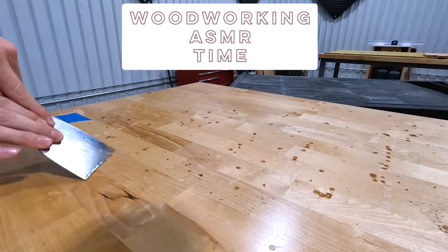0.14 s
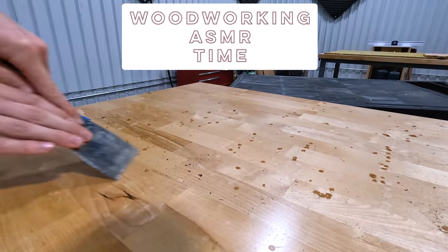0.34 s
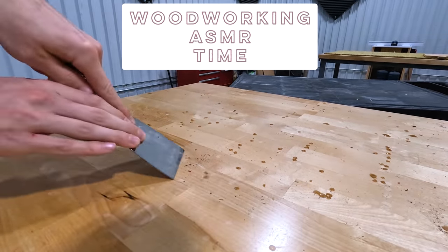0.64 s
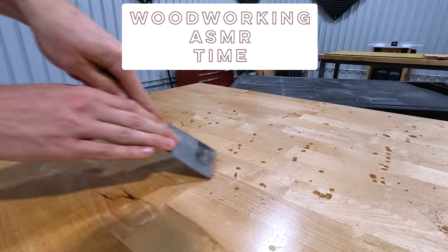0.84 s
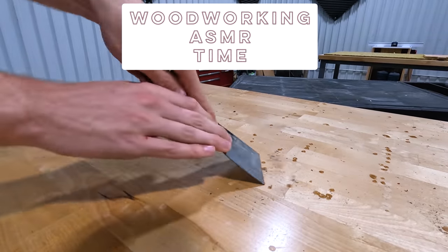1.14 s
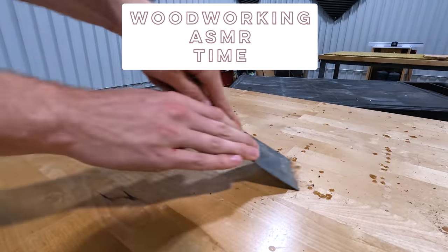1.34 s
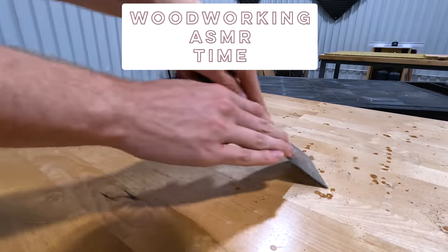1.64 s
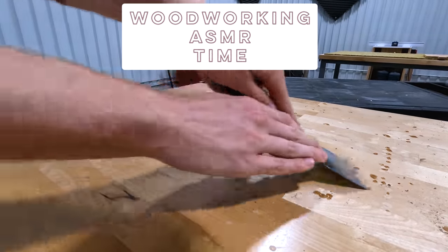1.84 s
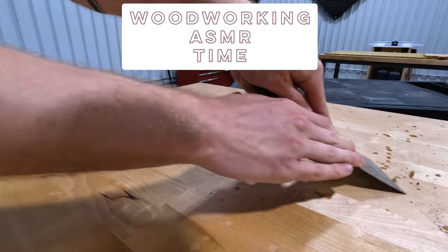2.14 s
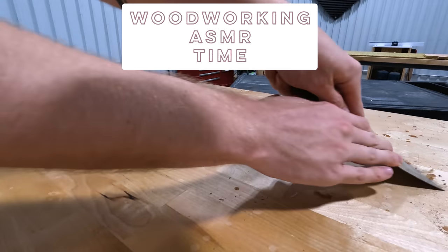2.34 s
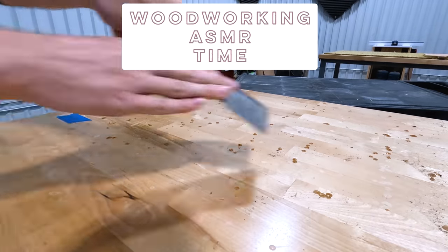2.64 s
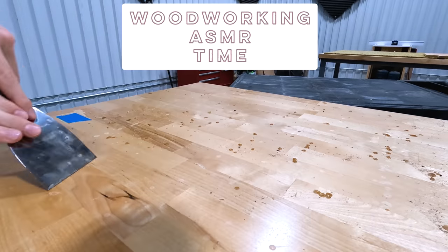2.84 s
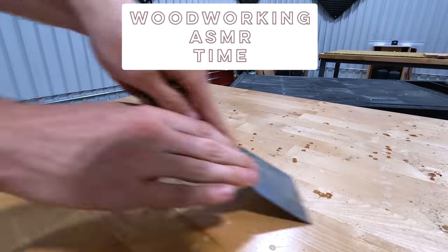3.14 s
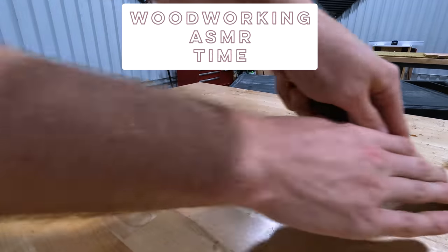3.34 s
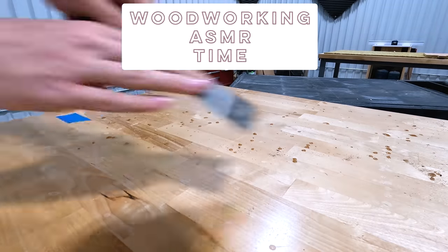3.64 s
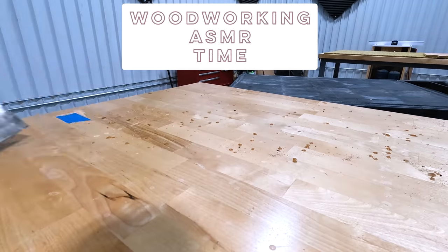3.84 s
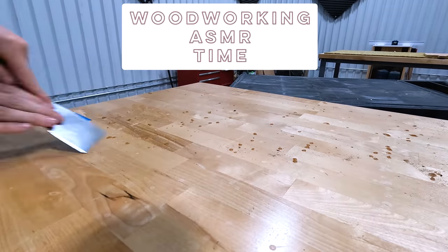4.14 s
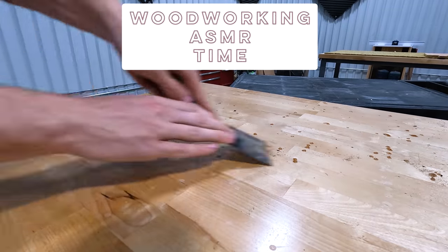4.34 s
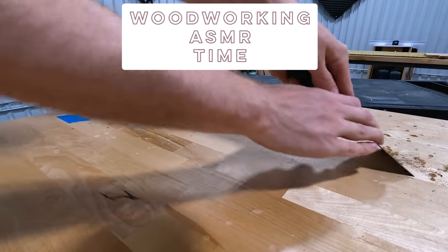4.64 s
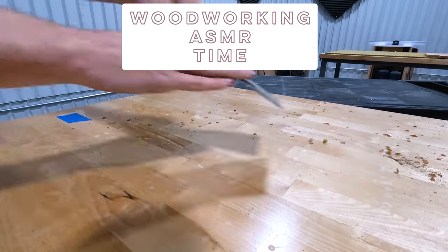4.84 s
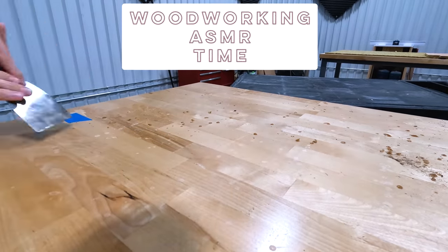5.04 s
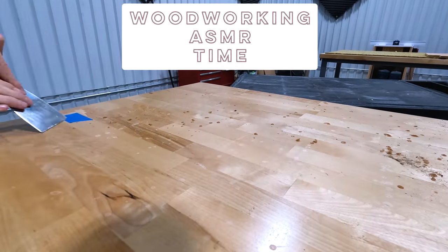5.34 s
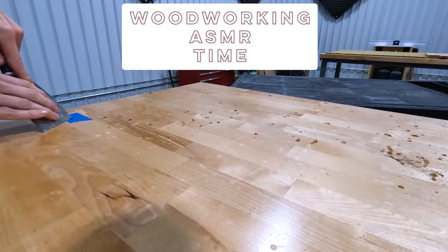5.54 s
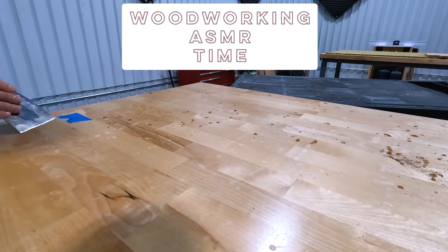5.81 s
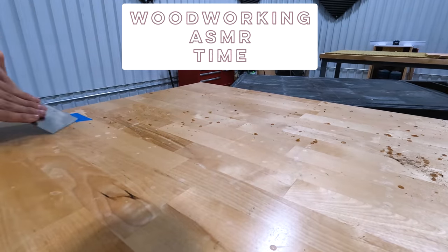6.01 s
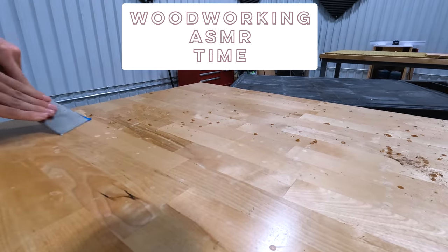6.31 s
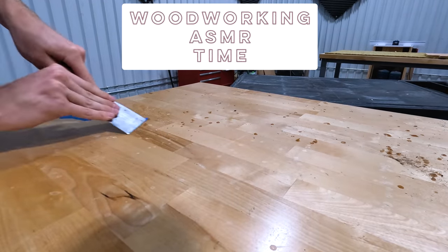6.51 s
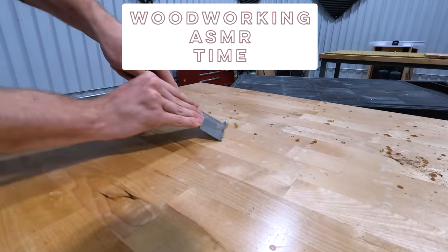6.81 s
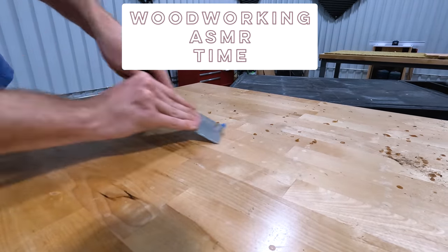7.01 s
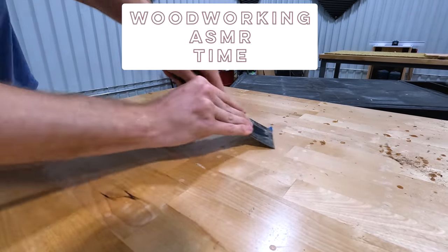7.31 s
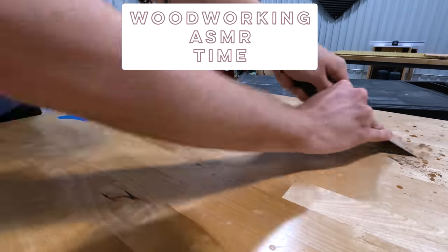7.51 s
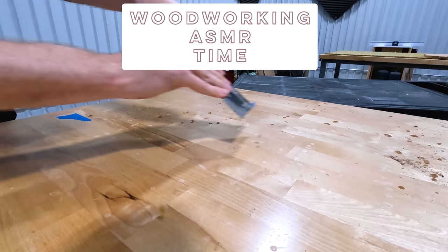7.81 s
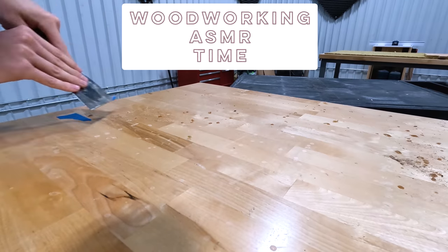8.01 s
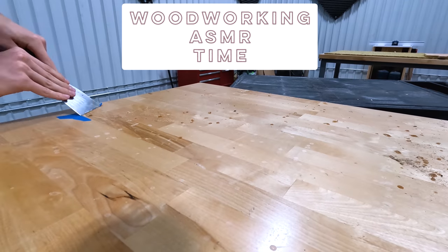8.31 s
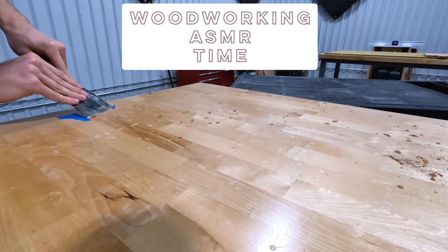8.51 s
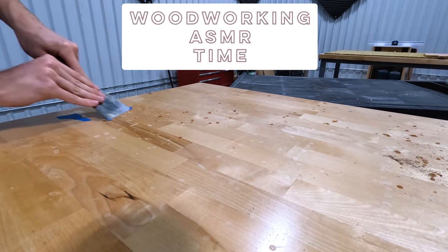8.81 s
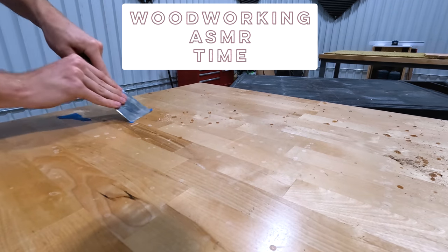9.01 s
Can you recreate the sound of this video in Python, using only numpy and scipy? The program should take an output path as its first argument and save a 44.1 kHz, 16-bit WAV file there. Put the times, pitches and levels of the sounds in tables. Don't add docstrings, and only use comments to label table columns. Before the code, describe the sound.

Close, dry workshop scraping: hissing metal edge strokes on wood, sharp snaps of hardened glue, hollow panel knocks and dull bench thuds.

```python
import sys
import numpy as np
from scipy import signal
from scipy.fft import rfft, irfft, next_fast_len
from scipy.io import wavfile
from scipy.ndimage import uniform_filter1d, map_coordinates

SR = 44100
rng = np.random.default_rng(int(sys.argv[2]) if len(sys.argv) > 2 else 0)


def transcribe(u):
    v = np.clip(np.atleast_2d(u).T, -1, 1)
    q = np.round(v * 32767).astype(np.int16)
    wavfile.write(sys.argv[1], SR, q)


def gain_from_db(level_db):
    decades = np.asarray(level_db, float) / 20
    return 10 ** decades


N = 403956

# time in seconds, sway level in dB, rumble level in dB.
BENCH_SWAY = [(0.0, -27.5, -45), (0.12, -32, -59), (1.28, -44, -47), (1.63, -23.5, -50.5), (2.22, -36, -49),
              (2.7, -31, -68), (4.23, -53, -74), (4.54, -49, -36), (4.69, -37.5, -48), (4.95, -18.5, -55),
              (5.61, -27.5, -53), (5.81, -43, -74), (6.02, -36.5, -64), (6.71, -36, -48), (8.09, -21, -56),
              (8.39, -28.5, -72.5), (9.01, -34.5, -63), (9.16, -32, -45)]
# frequency in Hz, level in dB per Hz.
SHOP_COLOUR = [(35, -35), (60, -10.5), (96, -6), (244, -4), (448, -12.5), (850, -12.5), (1660, -18.5),
               (6000, -30.5), (16000, -43)]
# frequency in Hz, time to fade by 60 dB in seconds.
WALL_FADE = [(200, 0.19), (2000, 0.6), (6000, 0.47), (12000, 0.24)]
# frequency in Hz, side minus middle in dB.
CHANNEL_GAP = [(60, -63), (200, -38.5), (700, -41.5), (1500, -38.5), (4000, -37), (9000, -37.5),
               (15000, -30)]

# frequency in Hz, level in dB, time to fade by 60 dB in seconds.
FRAME_NOTES = [(39.8, -9, 0.74), (91.8, 2.5, 0.48), (142.8, -3, 0.27), (185, -5.5, 0.22), (206, 2, 0.076),
               (238.4, -1.5, 0.12), (275, -6, 0.25), (337.6, 0, 0.074)]
# frequency in Hz, level in dB, time to fade by 60 dB in seconds.
PANEL_NOTES = [(391.6, -1, 0.12), (460.4, -4, 0.23), (534, 3.5, 0.057), (649, -7, 0.067), (700, 1.5, 0.13),
               (752, -4, 0.11), (949, 0, 0.089), (1051, -4.5, 0.073), (1180, -0.5, 0.087),
               (1325, -2, 0.086), (1492, 0.5, 0.046), (1806, 7, 0.034), (1940, -22.5, 0.067),
               (2200, 15, 0.0048)]
# frequency in Hz, level in dB, time to fade by 60 dB in seconds.
FREE_NOTES = [(2640, -14.5, 0.42), (4660, 0, 0.16), (7840, -2, 0.35)]
# frequency in Hz, width in Hz, level in dB held upright,
# level in dB leaning forward.
BLADE_NOTES = [(1610, 210, -14.5, -4.5), (3126, 37, -1.5, -1.5), (4210, 219, -4, -28),
               (5450, 37.6, -14.5, 4), (5820, 159, -5.5, -7), (6430, 170, -1.5, -13.5),
               (6960, 170, -25.5, 7.5), (8480, 100, -9, 13.5), (8700, 280, -6.5, -9.5),
               (9940, 170, -28, 2.5), (12340, 110, -16.5, 3), (12430, 160, -20, 3), (14300, 315, -15.5, 9)]
# frequency in Hz, level in dB per Hz.
HISS_COLOUR = [(290, -37), (500, -11.5), (3250, -6.5), (5710, -5.5), (7000, -7), (8580, -2), (10500, -9.5),
               (16000, -23)]
# frequency in Hz, level in dB per Hz.
CRACK_COLOUR = [(1000, -10), (1800, 3.5), (3200, 5), (5000, -4.5), (9000, -8), (13000, -11.5), (16000, -5)]

# time in seconds, strongest note in Hz under light pressure,
# forward lean from 0 to 1, freedom to sing in dB.
HANDS = [(0, 8670, 0, -4), (.55, 8500, 0, 15), (.75, 8480, 0.89, -5), (2.5, 8800, 0.75, -7),
         (3.05, 8160, 0.1, -12), (3.25, 8700, 0.93, 2), (3.45, 8700, 0.3, -2), (4.05, 8300, 0, -22),
         (4.17, 8450, 0.3, 1), (4.3, 8350, 0.43, 11.5), (4.5, 8640, 0.67, 12.5), (4.7, 8670, 0.76, -23),
         (5.4, 8270, 0, -26.5), (6.0, 8320, 0.32, 0.5), (6.5, 8380, 0.48, 2.5), (7.6, 8500, 0.7, 6.5),
         (8.5, 8400, 0, 1), (9.16, 8320, 0.27, 16)]
# time in seconds, middle note in Hz under light pressure,
# freedom to sing in dB, forward lean from 0 to 1.
FINGERS = [(0, 5450, 6, 0.26), (.6, 5350, 3.5, 0), (.75, 5440, 7, 0.64), (.95, 5480, 2.5, 0.63),
           (1.7, 5457, 4.5, 0.87), (2.5, 5480, 2.5, 0.63), (2.95, 5340, 0.5, 0), (3.2, 5426, 2.5, 1),
           (3.45, 5530, 0, 0.3), (4.05, 5040, 4, 0.25), (4.17, 5170, 9.5, 0.4), (4.3, 5450, 4.5, 0.55),
           (4.62, 5520, 2.5, 0.8), (5.4, 5170, -16, 0.2), (6.1, 5365, 9, 0.1), (7.5, 5430, -2, 0.94),
           (7.62, 5390, -13.5, .6), (8.55, 5300, 2, 0.14)]
# time in seconds, low note in dB, middle note in dB,
# blur of all notes in Hz.
FINGERTIPS = [(0, 0, -5, 44), (.62, -2.5, 2.5, 39.7), (.75, 1, 6.5, 15), (1.3, -4, 4, 15.4),
              (1.5, 0, 7, 15.15), (2.0, -2.5, 5, 18.14), (2.2, -6.5, 0, 22), (2.5, -5.5, 1.5, 26.8),
              (3.2, 1.5, 1.5, 24.5), (4.2, -3, 0.5, 18), (4.65, -1, 3, 18), (6.0, -2, -6.5, 79.4),
              (6.5, -3.5, -1, 84.4), (6.8, 1.5, -3.5, 90.8), (7.1, -4, 4.5, 35), (7.6, -6.5, 3.5, 35),
              (8.5, 0, 1, 40), (9.16, 3, 0, 39.5)]

# fastest moment in seconds, length in seconds, level in dB, brightness in dB.
PUSHES = [(0.163, 0.085, -33.5, -10.5), (0.406, 0.094, -32.5, -7), (0.649, 0.08, -32, 7),
          (0.899, 0.091, -29.5, 11.5), (1.136, 0.07, -27.5, 12.5), (1.379, 0.07, -28.5, 12),
          (1.622, 0.069, -29.5, 12.5), (1.871, 0.069, -28, 12.5), (2.119, 0.084, -26.5, 10.5),
          (2.363, 0.08, -28, 1), (6.06, 0.05, -31, 7), (6.111, 0.12, -29.5, 2.5), (6.446, 0.11, -27.5, 12),
          (6.787, 0.12, -24, 7), (7.126, 0.12, -25, 18), (7.481, 0.16, -29, 12.5), (8.581, 0.088, -35, 7),
          (8.919, 0.13, -27.5, 4)]
# fastest moment in seconds, level in dB.
PULLS = [(0.271, -37.5), (0.516, -37.5), (0.76, -39), (1.011, -42), (1.255, -39.5), (1.497, -36.5),
         (1.751, -41.5), (1.992, -38), (2.234, -37.5), (6.27, -34.5), (6.599, -34.5), (6.952, -35),
         (7.277, -35.5), (8.707, -38.5), (9.075, -36.5)]
# fastest moment in seconds, length in seconds, level in dB.
SCUFFS = [
    (0.034, 0.1, -38),
    (2.556, 0.04, -33.5),
    (3.518, 0.054, -59),
    (4.767, 0.037, -37.5),
    (5.243, 0.03, -53),
    (5.399, 0.079, -26.5),
    (5.832, 0.21, -68),
    (7.66, 0.051, -39.5),
]
# time in seconds, edge pressure as level in dB, brightness in dB.
SWEEPS = [
    [(2.88, -72, -7), (2.93, -43, -6), (3.0, -33, 13.5), (3.1, -28.5, 25), (3.18, -26.5, 12),
     (3.26, -33, 25.5), (3.34, -34.5, 5), (3.41, -37, -3), (3.47, -51, -13.5)],
    [(4.0, -74, -19), (4.07, -37, -9), (4.14, -25.5, 13), (4.23, -26.5, 17.5), (4.28, -28, 7),
     (4.39, -25, 7), (4.5, -40, 11), (4.6, -28.5, 11), (4.66, -55, -8)],
]
# time in seconds, length in seconds, note in Hz,
# half width as a share of the note, level in dB.
FLUTTERS = [(2.252, 0.056, 3220, .008, -49), (3.032, 0.18, 4500, 0.22, -42), (3.201, .3, 4220, 0.3, -50.5),
            (4.117, 0.11, 4510, 0.1, -39.5), (4.308, 0.074, 3260, 0.011, -32),
            (4.423, .1, 3400, 0.029, -41), (4.37, .2, 5620, 0.006, -42.5), (4.558, .17, 5700, .006, -46.5),
            (5.389, 0.074, 4900, .13, -39), (5.79, 0.09, 6600, .025, -66.5), (5.792, 0.13, 4260, .03, -73),
            (5.78, 0.15, 2620, 0.11, -60), (6.055, 0.055, 4200, .045, -48), (6.128, 0.067, 4300, .045, -49),
            (6.411, 0.084, 4280, 0.04, -44), (6.598, .07, 5500, .05, -48.5),
            (7.272, 0.068, 5500, 0.043, -46.5), (7.656, .04, 2300, 0.24, -51),
            (8.588, 0.088, 4250, .045, -51.5), (8.692, 0.069, 4260, .045, -57),
            (8.88, 0.12, 4250, .045, -49), (9.088, 0.13, 5500, 0.093, -50.5)]
# start in seconds, peak of the ring in dB.
LIFTS = [
    (2.568, -50),
    (4.785, -61),
]
# time in seconds, frequency in Hz, level in dB.
BENDING_NOTE = [
    (2.9, 1330, -72),
    (3.0, 1430, -62),
    (3.14, 1550, -64),
    (3.28, 1744, -53),
    (3.37, 1630, -60),
    (3.46, 1325, -54),
    (3.5, 1300, -79),
]
# start in seconds, peak in dB, centre in Hz.
THUDS = [(1.128, -23, 308), (1.176, -26, 178), (1.366, -34.5, 290), (1.626, -17.5, 334), (1.647, -31, 85),
         (2.117, -35, 187), (2.139, -23, 195), (3.243, -29, 291), (4.22, -27.5, 160.6), (4.376, -22, 226),
         (4.435, -32, 213), (4.494, -19.5, 280), (4.598, -29, 214), (4.636, -32.5, 290), (5.41, -23, 208),
         (6.07, -24, 159), (6.444, -23.5, 200), (6.494, -24.5, 230), (6.784, -11.5, 203), (6.811, -18, 277),
         (7.533, -31.5, 341), (8.803, -39, 160)]

# start in seconds, crack peak in dB,
# knock over crack in dB, knock centre in Hz.
QUICK_BEADS = [(0.1464, -10, -16.5, 1240), (0.173, -3.5, -17, 740), (0.4135, -2, -21, 760),
               (0.6697, -15, -9.5, 980), (1.1752, -21.5, 1.5, 515), (1.3664, -7.5, -5, 1070),
               (1.6247, -2, -20, 890), (1.6345, -22, 9, 702), (1.6482, -28.5, 9.5, 693),
               (1.8583, -3.5, -8.5, 890), (2.0981, -9.5, -12.5, 1960), (2.1187, -14, -5.5, 1020),
               (2.1344, -12.5, -5, 714), (2.36, -4, -12.5, 1240), (2.3715, 3, -17, 680)]
SWEEP_BEADS = [(4.135, -20.5, -9.5, 965), (4.2152, -4.5, -13, 700), (4.2258, -15.5, 4.5, 761),
               (4.2328, -7, -1.5, 720), (4.2396, -20, 3, 720), (4.2738, -3, -6.5, 1180),
               (4.2884, -5, -12, 1700), (4.2952, -15.5, -5.5, 1800), (4.3098, -1.5, -23, 700),
               (4.3747, -5.5, -11.5, 1300), (4.3862, -2, -12, 995), (4.4024, -7.5, -17, 708),
               (4.4383, -4.5, -12, 1120), (4.448, -22, -2, 1100), (4.4738, -7.5, -8.5, 755),
               (4.481, -23, -2, 810), (4.4967, -8.5, -7, 794), (4.504, -22.5, 3, 820), (4.515, -30, 3, 720),
               (4.603, -20.5, 2.5, 700), (4.6364, -40.5, 22, 656)]
FAR_BEADS = [(6.0686, -25.5, -2, 710), (6.1112, -10.2, -10, 1925), (6.4363, -28, 1, 1675),
             (6.4488, -15, 2.5, 690), (6.7538, -11.2, -12.2, 1125), (6.7654, -3, -10.5, 1180),
             (6.7836, 1, -12.5, 765), (6.8086, 2.2, -8.5, 790), (7.1258, 1.2, -20.5, 1280),
             (7.1699, -7.2, -15, 734), (7.4406, -8, -16.5, 1045), (7.4488, -8, -9, 690),
             (7.5256, -15.5, -2, 1870), (7.5347, -15.7, 4, 706), (8.8975, -4.5, -18, 1925),
             (8.9095, -7.5, -10, 1465)]
TOUCHES = [
    (0.0012, -24.5, -4.5, 1085),
    (2.8918, -16.5, -19, 1165),
    (3.4109, -29, -10, 1535),
    (3.5205, -26.5, -10, 1095),
    (3.9702, -20.5, -13.2, 1840),
    (5.2255, -16.5, -30, 505),
    (5.4115, -27.2, -3.2, 1255),
    (6.2709, -12, -10, 1805),
]
CHIPS = [
    (4.8995, -32, -16, 570),
    (7.7474, -33.5, -16.5, 497),
    (7.8817, -37.5, -22, 506),
]
SOFT_BEADS = [(1.1336, -18, 1.1, 945), (1.6272, -24, 4, 945), (1.8595, -16.5, 1.5, 1500),
              (2.3752, -20.5, 3, 715), (3.1652, -7.5, -7.5, 1235), (3.2458, -19, -2.5, 1005),
              (4.2272, -14.5, 2.2, 1245), (4.2822, -18, 0.5, 1805), (4.3802, -14, -0.2, 975),
              (4.6242, -26.2, -9, 2305), (5.4122, -26.5, 1, 1005), (8.3907, -36.5, 1.5, 725)]
TICKS = [(.168, -10.5, -9, 1264), (1.3134, -36.5, -3, 1950), (1.5594, -37, -6, 1900),
         (1.7325, -48, -15, 1700), (3.04, -29, -13, 2300), (3.181, -12, -22, 1500), (3.308, -25, -12, 1816),
         (4.1929, -24, -2.5, 1740), (7.3492, -37, -6, 2090), (7.557, -13.5, -12, 1800),
         (7.903, -42.5, -19, 502), (8.805, -37, -3.5, 930), (8.83, -35, -0.5, 920), (8.855, -40, -6, 806),
         (8.918, -3, -15.5, 1500)]
HARD_BEADS = [
    (.9476, -22, -14, 910),
    (1.1316, -6.5, -12, 950),
    (4.3016, 2.5, -14, 724),
    (6.4936, -11.5, -6, 744),
    (8.9265, -4.5, -11, 850),
]
# its table, top end in dB, blade ring in dB,
# share of the panel's free ring time.
CONTACTS = [(QUICK_BEADS, -9, -11.5, 0.82), (SWEEP_BEADS, -42, -5, 0.95), (FAR_BEADS, -2, -10, 0.97),
            (TOUCHES, -17, -28, 0.84), (CHIPS, -6, -19, 0.6), (TICKS, -15, -28, 1),
            (SOFT_BEADS, -46.5, -28, 0.87), (HARD_BEADS, 7.2, -6.5, .9)]


def unit(x):
    return x / np.sqrt(np.mean(x ** 2) + 1e-20)


def peak(x):
    return x / np.max(np.abs(x))


def along(points, hz):
    f, value = np.transpose(points)
    return np.interp(np.log(hz + 1), np.log(f + 1), value)


def curves(rows):
    s, *columns = np.transpose(rows)
    return [np.interp(np.arange(N) / SR, s, column) for column in columns]


def wobble(rate):
    coarse = np.arange(0, N + 32, 32)
    knots = rng.standard_normal(int(N * rate / SR) + 4)
    return np.interp(np.arange(N), coarse, map_coordinates(knots, [coarse * rate / SR]))


def filtered(x, response):
    size = next_fast_len(x.shape[-1] + 8192)
    spectrum = rfft(x, size) * response(np.fft.rfftfreq(size, 1 / SR))
    return irfft(spectrum, size)[..., :x.shape[-1]]


def patchy(x, depth_db):
    z = signal.stft(x, nperseg=256)[2]
    field = uniform_filter1d(rng.standard_normal(z.shape), size=5, axis=0)
    field = uniform_filter1d(field, size=14, axis=1)
    return signal.istft(z * gain_from_db(depth_db * unit(field)), nperseg=256)[1][:N]


def add(track, s, sound):
    start = round(s * SR)
    track[start:start + len(sound)] += sound[:len(track) - start]


def sway():
    rock_db, rumble_db = curves(BENCH_SWAY)
    third_db = rock_db - 24
    turn = 2 * np.pi * np.cumsum(7.5 + 0.8 * wobble(1.8)) / SR
    rock = gain_from_db(rock_db + 1.5 * wobble(4.5)) * np.sin(turn)
    shake = gain_from_db(third_db + 3 * wobble(13.0)) * np.sin(3 * turn)
    rumble_colour = [(8, -20.5), (20, -1.5), (45, 5.0), (90, -47.0)]  # Hz, dB
    rumble = unit(filtered(rng.standard_normal(N), lambda f: gain_from_db(along(rumble_colour, f))))
    return np.sqrt(2) * (rock - shake) + gain_from_db(rumble_db) * rumble


def shop():
    hum = filtered(rng.standard_normal(N), lambda hz: gain_from_db(along(SHOP_COLOUR, hz)) * (hz > 60))
    return gain_from_db(-56 + 1.0 * wobble(6.8)) * unit(hum)


def ringing(modes, t, weight_db, lasts=1):
    hz, db, t60 = np.transpose(modes)[:, :, None]
    strength, phase, detune = rng.standard_normal((3, len(modes), 1))
    level = gain_from_db(db + weight_db(hz) + 1.9 * strength - 60 * t / (lasts * t60))
    tones = np.sin(2 * np.pi * hz * (1 + 0.005 * detune) * t + 0.84 * phase)
    return peak(np.sum(level * tones, 0))


def snap(wood, kicks, bead, top_db, ring_db, lasts):
    s, db, knock_db, hz = bead
    top_db = top_db - 0.15 * (db + 5.5)
    ring_db = ring_db - 0.21 * (db + 11.0)
    t, panel_t = np.arange(4096) / SR, np.arange(SR // 5) / SR

    def near_db(f):
        return -9 * np.abs(np.log2((f + 1) / hz)) ** 0.62

    def colour_db(f):
        treble = np.clip(np.log2((f + 1) / 3500) * 0.21, 0, 1)
        return along(CRACK_COLOUR, f) + (top_db + 6.0) * treble

    def onset(time):
        return 1 - np.exp(-time / (0.00042 * gain_from_db(0.5 * knock_db - 3.0)))

    crack, rattle, kick = rng.standard_normal((3, 4096))
    crack[0] += 3.48 * np.sign(crack[0])
    crack = peak(filtered(crack, lambda f: gain_from_db(colour_db(f))) * gain_from_db(-60 * t / 0.029))
    rattle = peak(filtered(rattle, lambda f: gain_from_db(1.83 * near_db(f))) * gain_from_db(-60 * t / 0.15))
    knock = ringing(PANEL_NOTES, panel_t, lambda f: 1.47 * near_db(f), lasts)
    kick = (0.31 * kick + 1.51 * (t == 0)) * gain_from_db(-60 * t / 0.00094)
    add(wood, s, gain_from_db(db - 9.0) * crack + gain_from_db(db + knock_db - 11.5) * rattle * onset(t))
    add(wood, s, gain_from_db(db + knock_db - 0.47) * peak(knock * onset(panel_t)))
    add(kicks, s, gain_from_db(db + ring_db + 5.5) * kick)


def snaps():
    wood, kicks = np.zeros(N), np.zeros(N)
    for beads, top_db, ring_db, lasts in CONTACTS:
        for bead in beads:
            snap(wood, kicks, bead, top_db, ring_db, lasts)
    return wood, kicks


def strokes():
    t = np.arange(N // 64 + 2) * 64 / SR
    free_db = np.interp(t, *np.transpose(HANDS)[[0, 3]])
    # moment, length, share of it spent speeding up, level, singing and brightness in dB
    moves = [(s, length, 0.54, db, 0, bright_db) for s, length, db, bright_db in PUSHES]
    for s, db in PULLS:
        since_push = min(s - push[0] for push in PUSHES if push[0] < s)
        moves.append((s, 0.54 * since_push, 0.51, db, 0.5, -15 + 2.07 * (db + 44.0)))
    for s, length, db in SCUFFS:
        moves.append((s, length, 0.57, db, -51, -10.5 + 1.03 * (db + 41.5)))

    swells = []
    for s, length, rise, db, sing_db, bright_db in moves:
        span = length * np.where(t < s, rise, 1 - rise)
        steepness = np.where(t < s, 2.2, 2.9)
        swells.append((db - 9 * np.abs((t - s) / span) ** steepness, sing_db, bright_db))
    for s, db, bright_db in map(np.transpose, SWEEPS):
        swells.append((np.interp(t, s, db, left=-200, right=-200), 0, np.interp(t, s, bright_db)))

    power = 0
    for swell_db, sing_db, bright_db in swells:
        sing_db = sing_db + free_db
        bright_db = bright_db + 0 * t
        low_sing_db = 0.11 * sing_db - 0.087 * bright_db - 11.0
        high_sing_db = 0.78 * sing_db - 11.5
        shares_db = np.array([-0.55 * bright_db, 0.63 * bright_db, low_sing_db, high_sing_db])
        power = power + gain_from_db(swell_db + shares_db) ** 2
    return [np.interp(np.arange(N) / SR, t, np.sqrt(p)) for p in power]


def blade(low_force, high_force, pressure):
    note_hz, lean, _ = curves(HANDS)
    middle_hz, free_db, low_lean = curves(FINGERS)
    low_db, middle_db, blur_hz = curves(FINGERTIPS)
    low_force = low_force * gain_from_db(free_db)
    blur = np.exp(2j * np.pi * np.cumsum(np.abs(blur_hz) * wobble(400)) / SR)
    out = np.zeros(N)
    for hz, width, upright_db, forward_db in BLADE_NOTES:
        if hz < 7700:
            force, tilt, waver = low_force, np.clip(low_lean, 0, 1), blur
            rest = (middle_hz / 5450) ** (5450 / hz) ** 0.88
        else:
            force, tilt, waver = high_force, np.clip(lean, 0, 1), blur ** 2
            rest = note_hz / 8480
        bend = 0.0106 * (8480 / hz) ** 1.59 * pressure
        moving_hz = hz * (rest + bend + 0.0028 * wobble(7.8))
        carrier = np.exp(2j * np.pi * np.cumsum(moving_hz) / SR)
        grip_db = upright_db + tilt * (forward_db - upright_db) + 1.8 * wobble(8)
        grip_db = grip_db + low_db * (2800 < hz < 3600) + middle_db * (5000 < hz < 5750)
        pole = np.exp(-np.pi * width / SR)
        ring = signal.lfilter([np.sqrt(1 - pole ** 2)], [1, -pole], force * carrier.conj())
        out += gain_from_db(grip_db) * (ring * carrier * waver).real
    return out


def scrape(kicks):
    dull, bright, low_sing, high_sing = strokes()
    pressure = np.clip(3 + np.log10(dull * bright + 1e-12) * 10 / 15, 0, 1.3)
    catches = rng.random(N) < 0.02
    fibres = gain_from_db(4.3 * np.minimum(rng.exponential(size=N), 3.5) * catches)
    roughness = gain_from_db(0.45 * wobble(40) + 0.53 * wobble(250))
    grit = unit(rng.standard_normal(N) * fibres * roughness)
    hiss = unit(filtered(patchy(grit, depth_db=2.4), lambda hz: gain_from_db(along(HISS_COLOUR, hz))))
    high = filtered(hiss, lambda hz: 1 / (1 + (8000 / (hz + 1)) ** 3))
    steel = blade(0.51 * low_sing * grit + 0.48 * kicks, 0.81 * high_sing * grit + kicks, pressure)
    return gain_from_db(-9.5) * (dull * (hiss - high) + bright * high) + steel


def thuds():
    out, t = np.zeros(N), np.arange(SR // 2) / SR
    for s, db, hz in THUDS:
        frame = ringing(FRAME_NOTES, t, lambda f: np.maximum(-17 * np.abs(np.log2(f / hz)), -19))
        add(out, s, gain_from_db(db + 6.5) * frame * (1 - np.exp(-t / 0.0041)))
    return out


def fluttering():
    out = np.zeros(N)
    for s, length, hz, width, db in FLUTTERS:
        t = np.arange(round(2 * length * SR)) / SR - length
        noise = rng.standard_normal(len(t))
        noise = filtered(noise, lambda f: 1 / (1 + ((f - hz) / (width * hz)) ** 2))
        add(out, s - length, gain_from_db(db - 42 * (t / length) ** 2) * unit(noise))
    return out


def lifting():
    out, t = np.zeros(N), np.arange(SR // 2) / SR
    for s, db in LIFTS:
        add(out, s, gain_from_db(db) * ringing(FREE_NOTES, t, lambda f: 0 * f))
    return out


def bowing():
    hz, db = curves(BENDING_NOTE)
    return gain_from_db(db) * (db > -69) * wobble(70) * np.sin(2 * np.pi * np.cumsum(hz) / SR)


def walls(x):
    hz, t, z = signal.stft(rng.standard_normal(SR), SR, nperseg=256)
    fade = gain_from_db(-60 * t / along(WALL_FADE, hz)[:, None])
    tail = signal.istft(z * fade, SR, nperseg=256)[1]
    return signal.fftconvolve(np.pad(x, (400, 0)), tail / np.linalg.norm(tail))[:N]


def scene():
    wood, kicks = snaps()
    work = wood + scrape(kicks) + thuds() + fluttering() + lifting() + bowing()
    return np.tile(work + gain_from_db(-20.0) * walls(work) + sway() + shop(), (2, 1))


def band_limit(x):
    return signal.sosfilt(signal.butter(12, 16670, fs=SR, output="sos"), x)


def record(dry):
    z = signal.stft(filtered(dry[0], lambda hz: gain_from_db(along(CHANNEL_GAP, hz))), nperseg=512)[2]
    scrambled = z * np.exp(2j * np.pi * rng.random(z.shape))
    side = signal.istft(scrambled, nperseg=512)[1][:N]
    side = gain_from_db(-1.5) * patchy(side * gain_from_db(6.5 * wobble(15)), depth_db=8.5)
    pair = dry + np.array([side, -side])
    pair = pair / (1 + (pair / 0.95) ** 6) ** (1 / 6)
    mix = filtered(pair, lambda hz: gain_from_db(np.interp(hz, [15700, 15850, 16600], [0, -44, -56])))
    return band_limit(mix)


dry = scene()
out = record(dry)
transcribe(out)
```